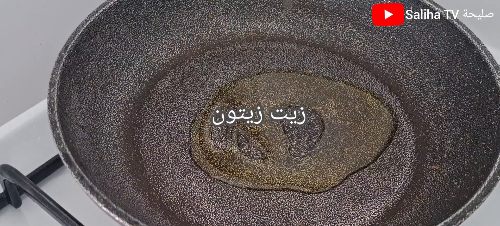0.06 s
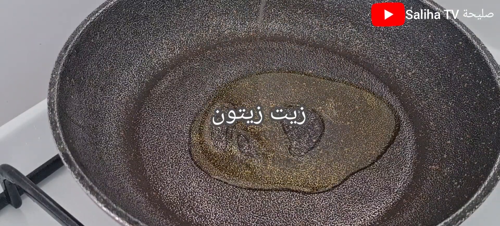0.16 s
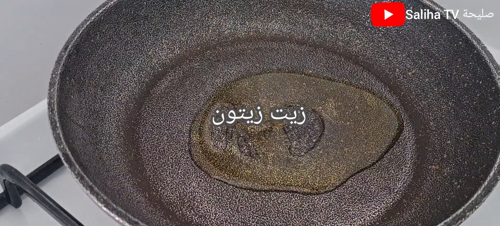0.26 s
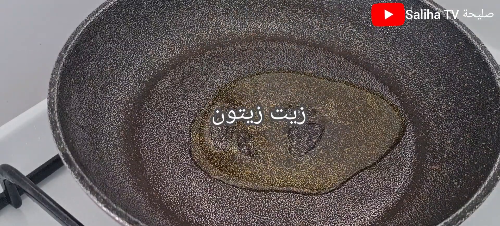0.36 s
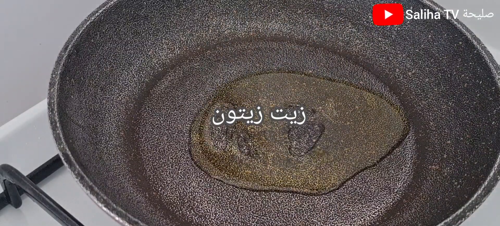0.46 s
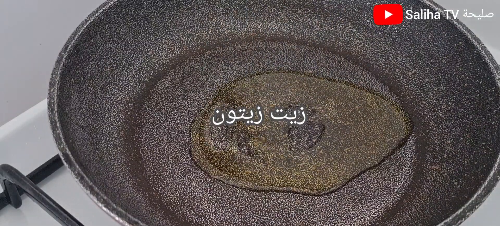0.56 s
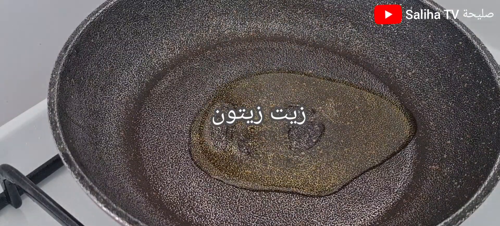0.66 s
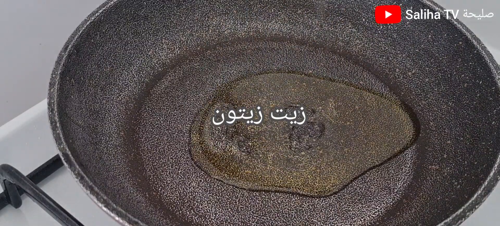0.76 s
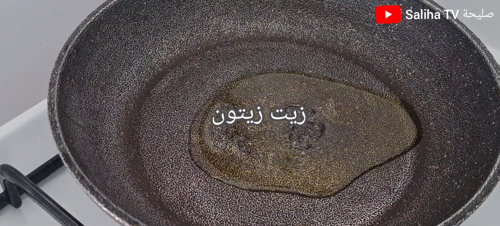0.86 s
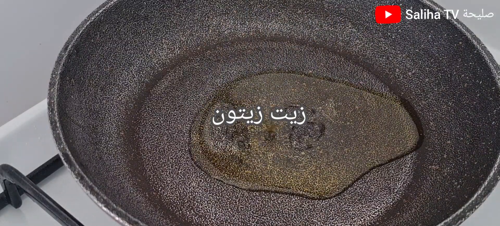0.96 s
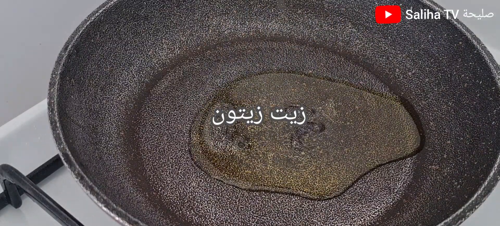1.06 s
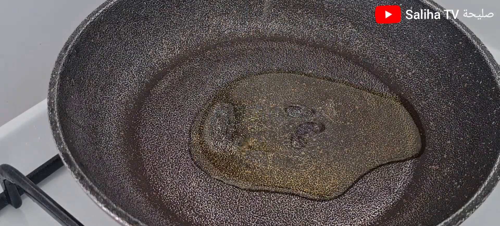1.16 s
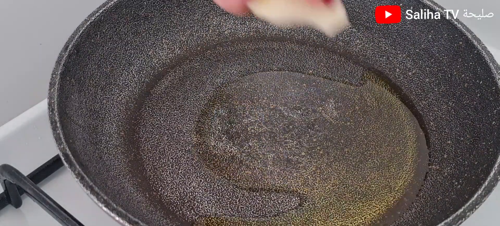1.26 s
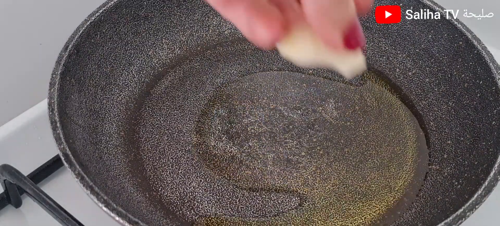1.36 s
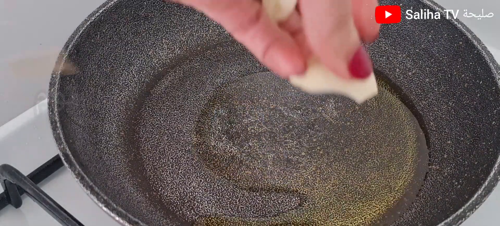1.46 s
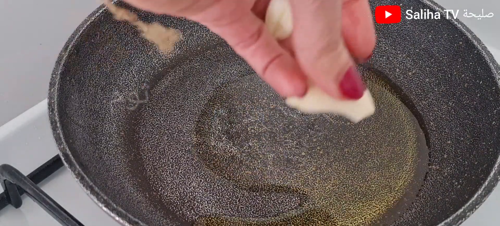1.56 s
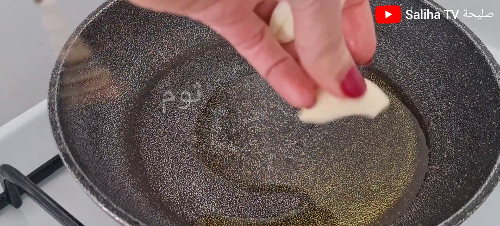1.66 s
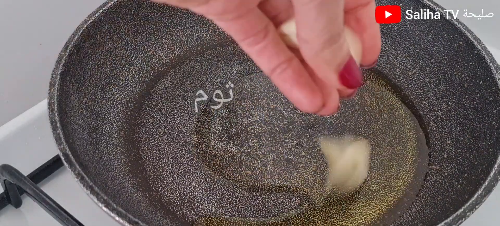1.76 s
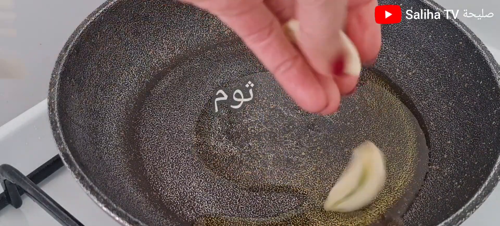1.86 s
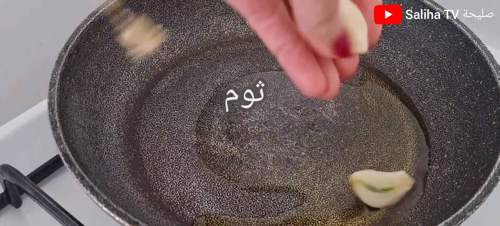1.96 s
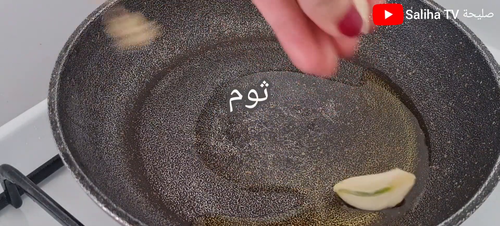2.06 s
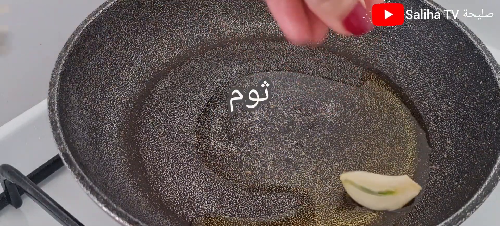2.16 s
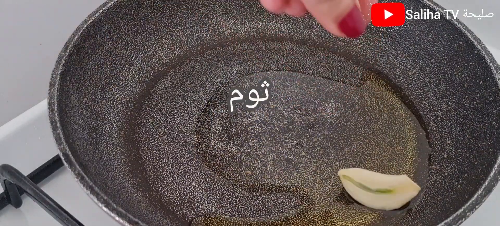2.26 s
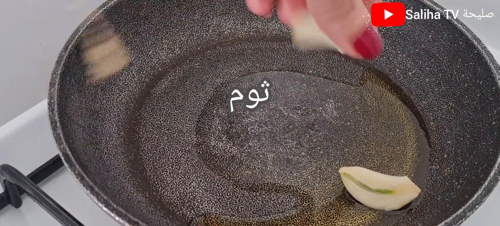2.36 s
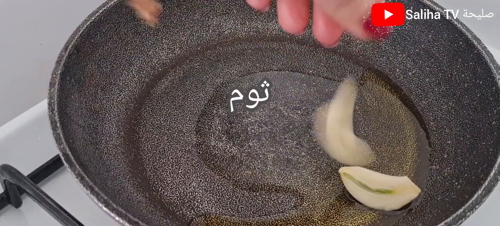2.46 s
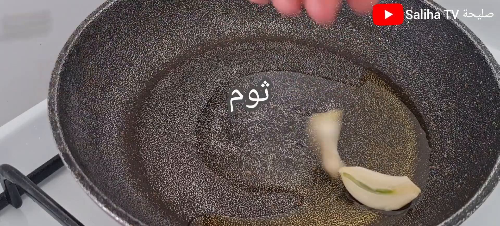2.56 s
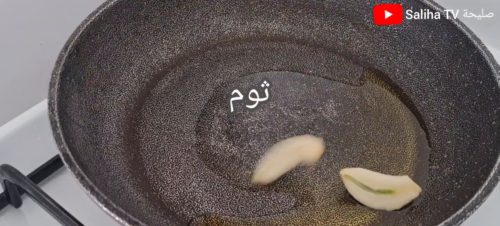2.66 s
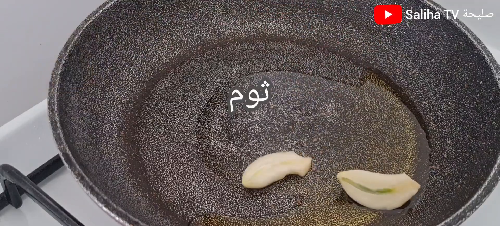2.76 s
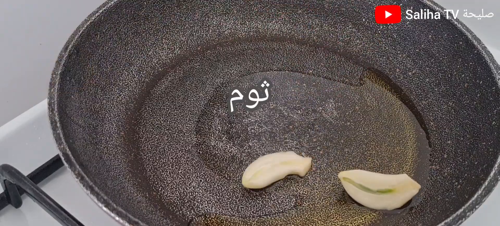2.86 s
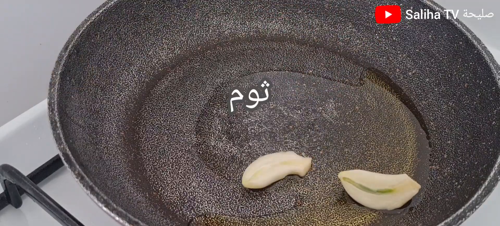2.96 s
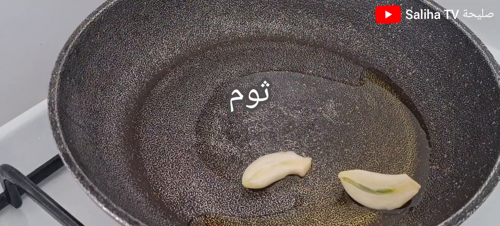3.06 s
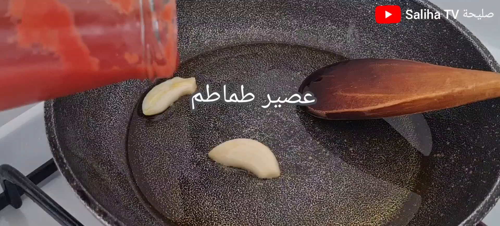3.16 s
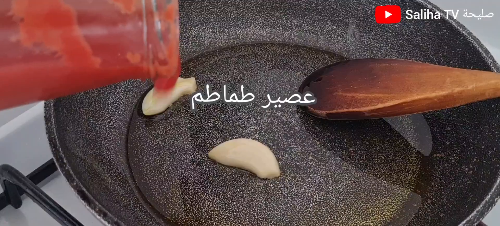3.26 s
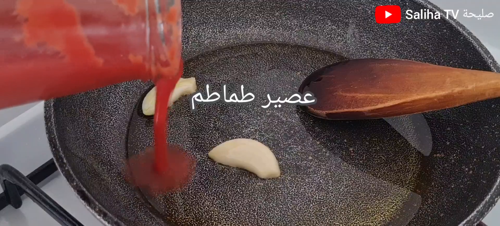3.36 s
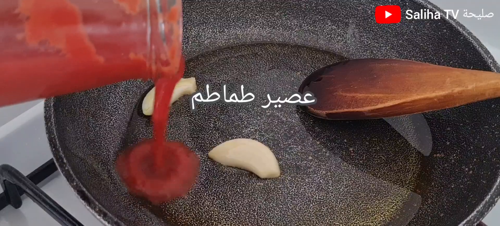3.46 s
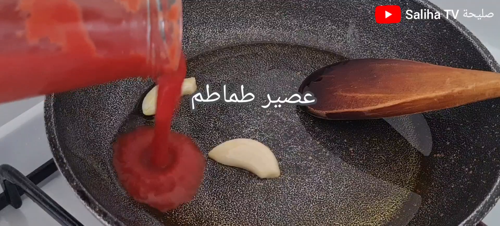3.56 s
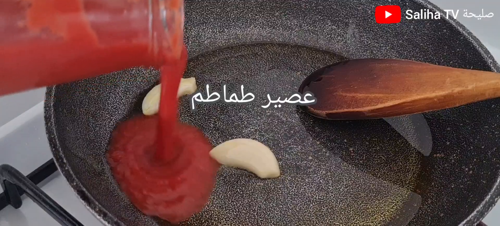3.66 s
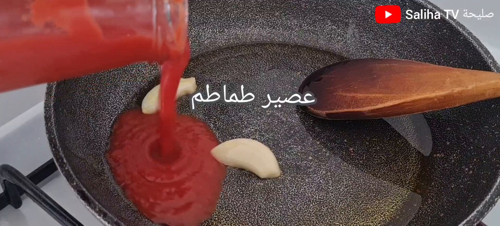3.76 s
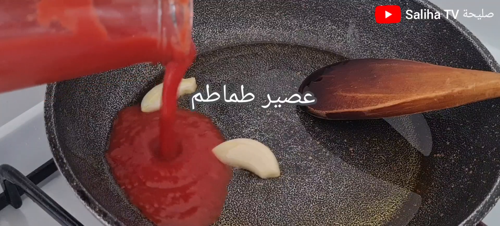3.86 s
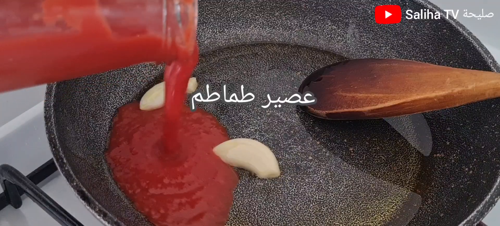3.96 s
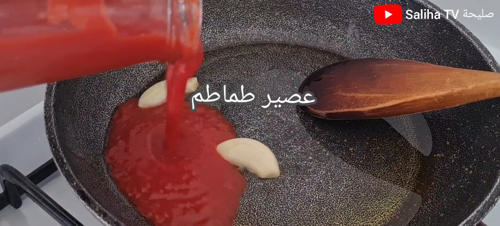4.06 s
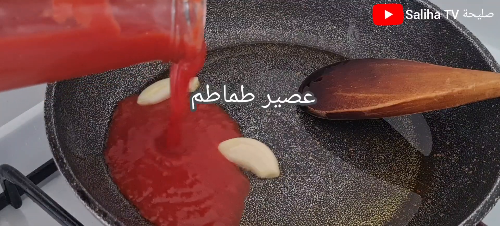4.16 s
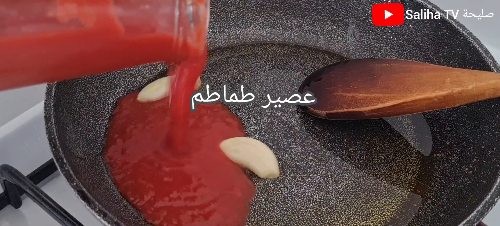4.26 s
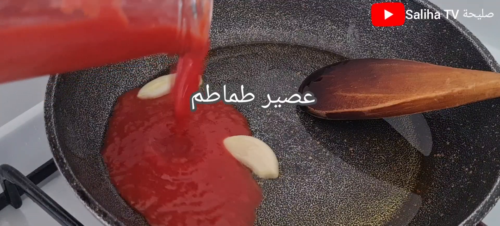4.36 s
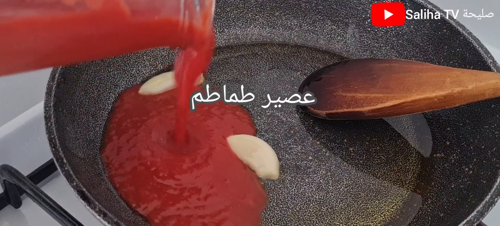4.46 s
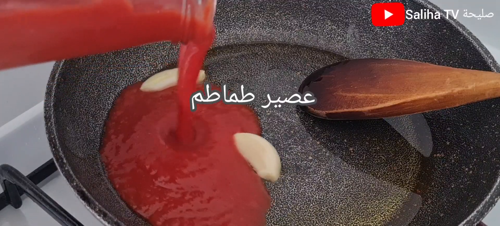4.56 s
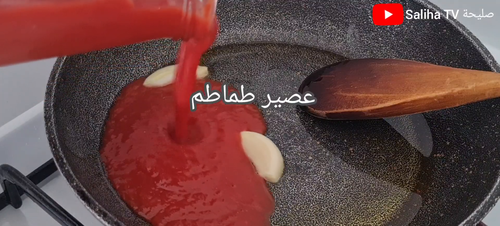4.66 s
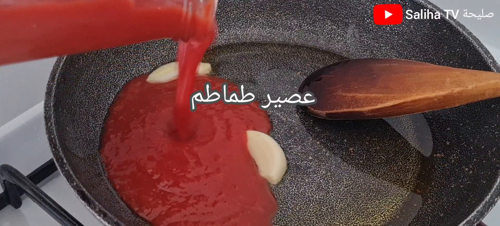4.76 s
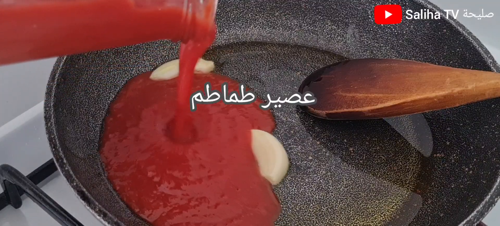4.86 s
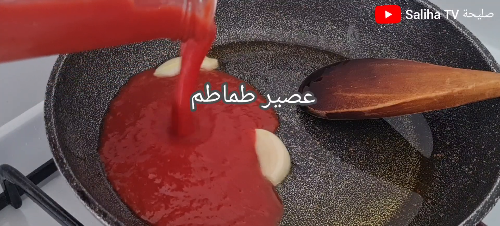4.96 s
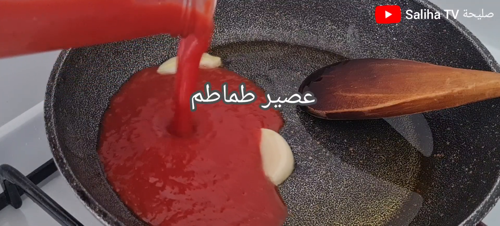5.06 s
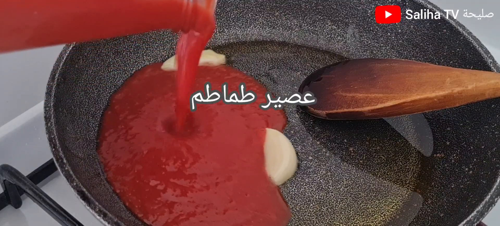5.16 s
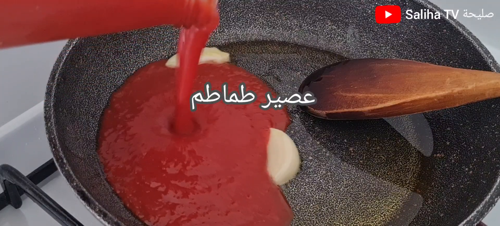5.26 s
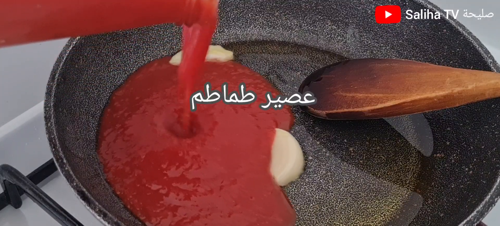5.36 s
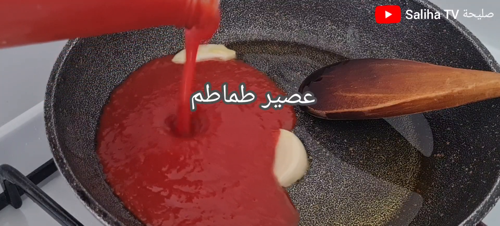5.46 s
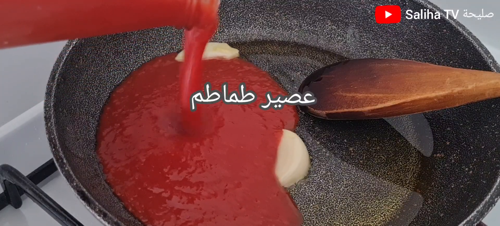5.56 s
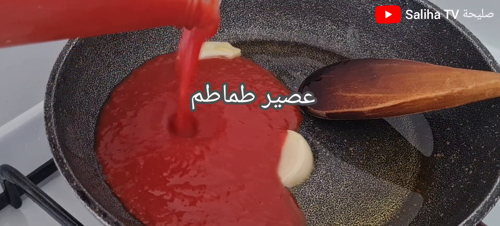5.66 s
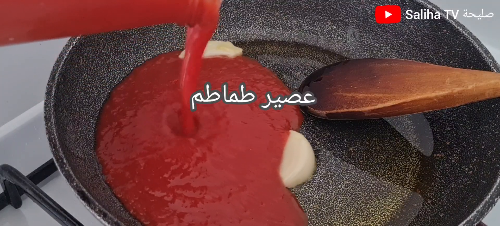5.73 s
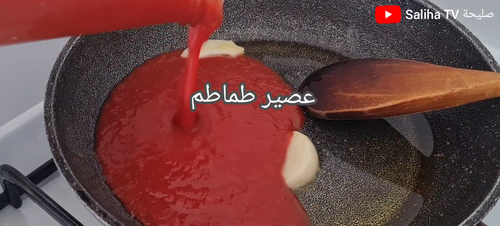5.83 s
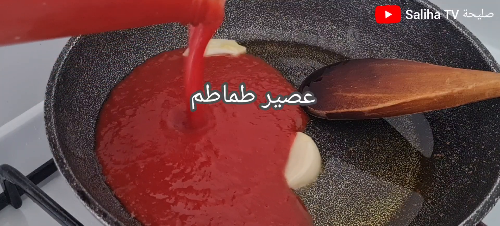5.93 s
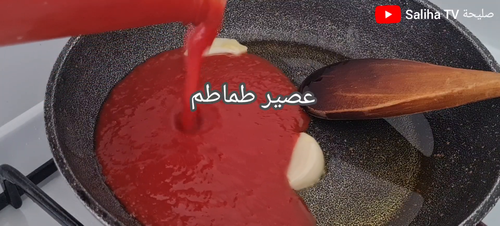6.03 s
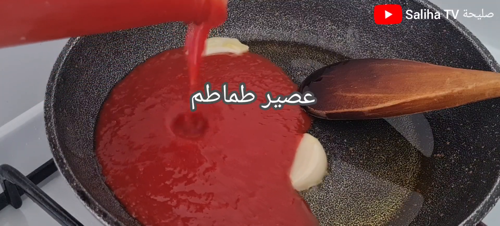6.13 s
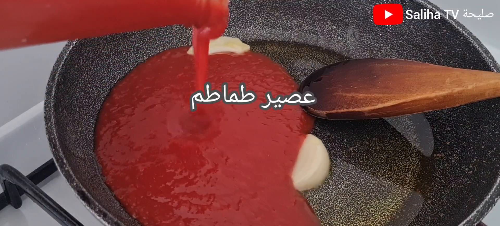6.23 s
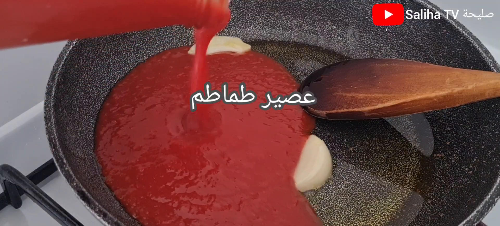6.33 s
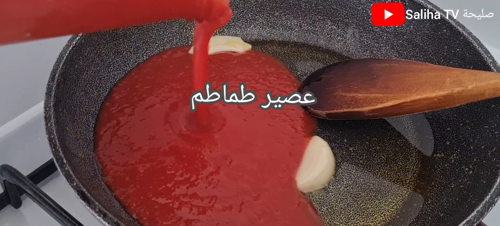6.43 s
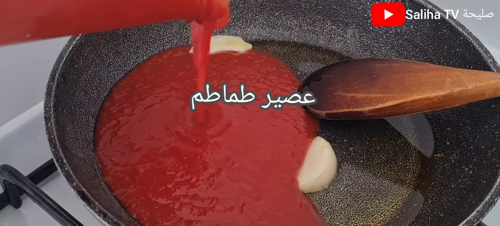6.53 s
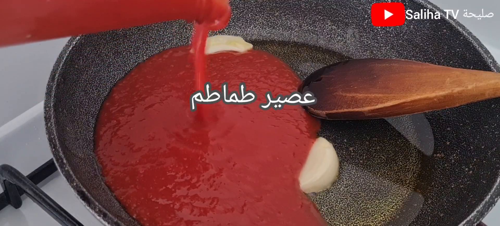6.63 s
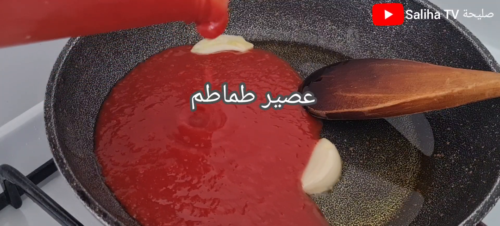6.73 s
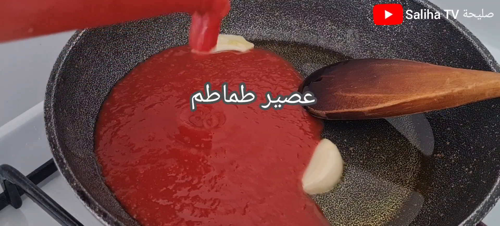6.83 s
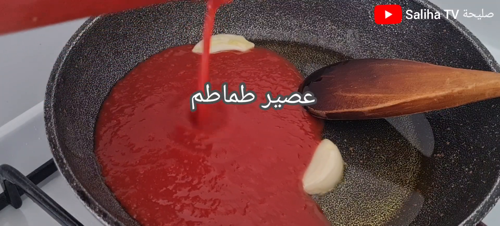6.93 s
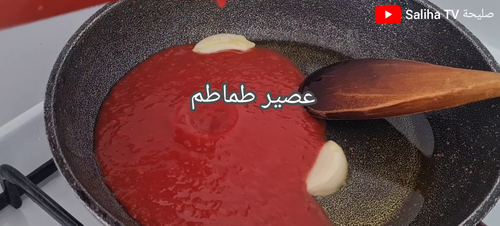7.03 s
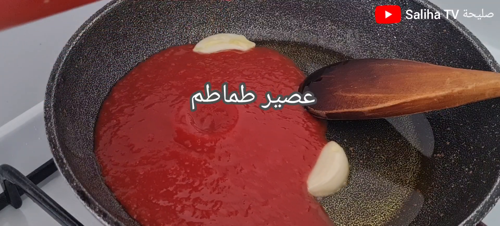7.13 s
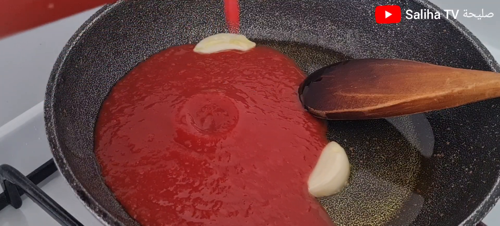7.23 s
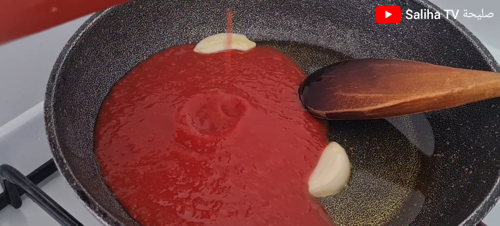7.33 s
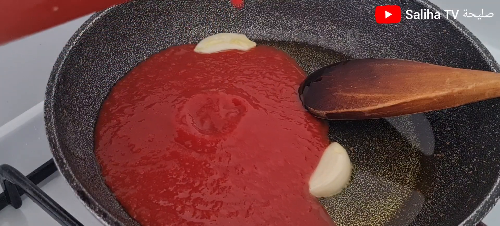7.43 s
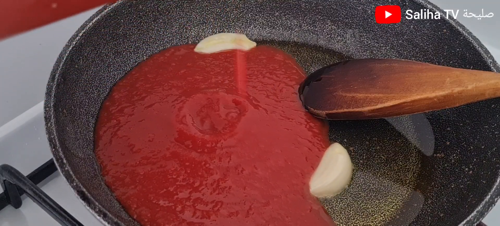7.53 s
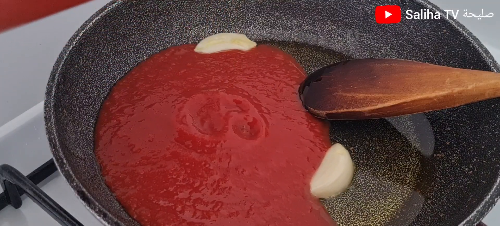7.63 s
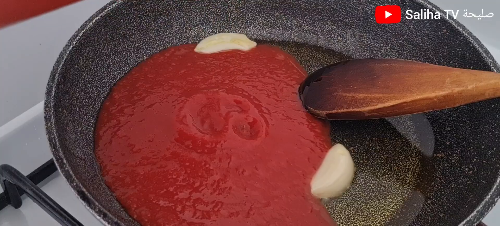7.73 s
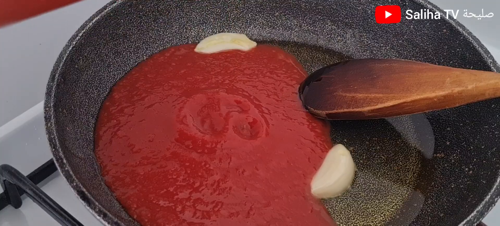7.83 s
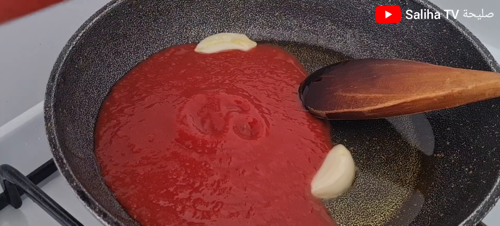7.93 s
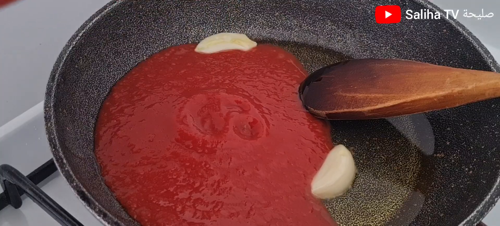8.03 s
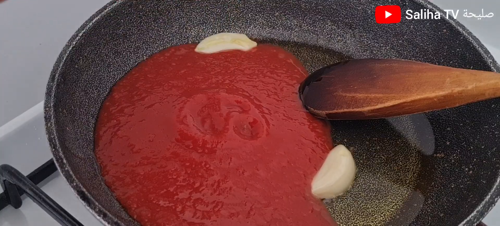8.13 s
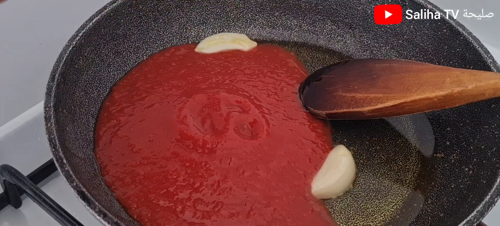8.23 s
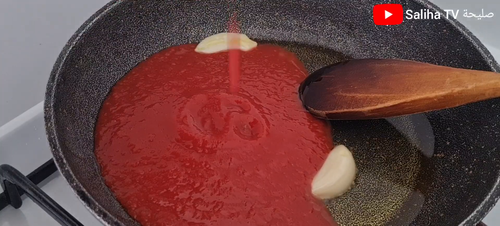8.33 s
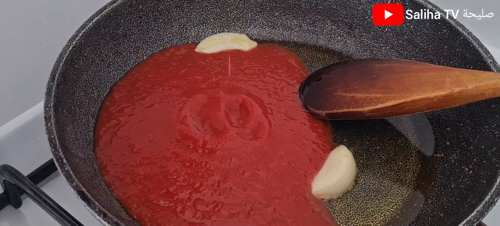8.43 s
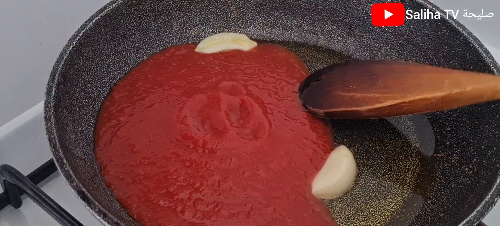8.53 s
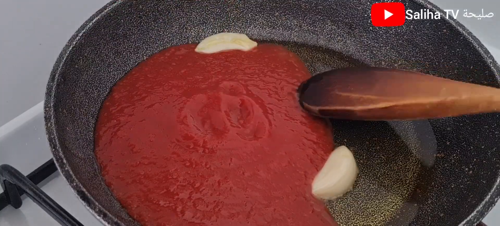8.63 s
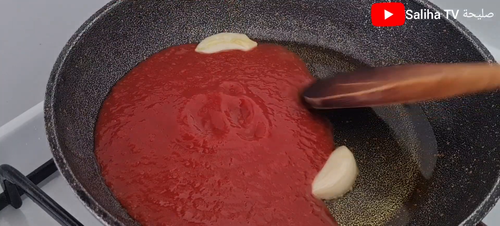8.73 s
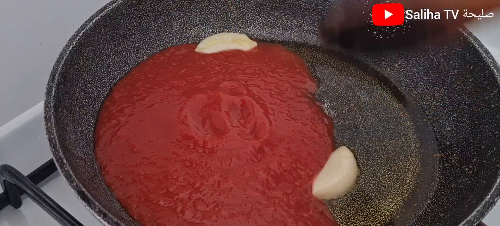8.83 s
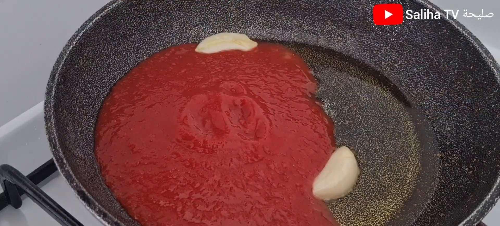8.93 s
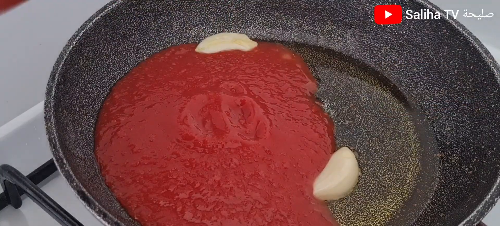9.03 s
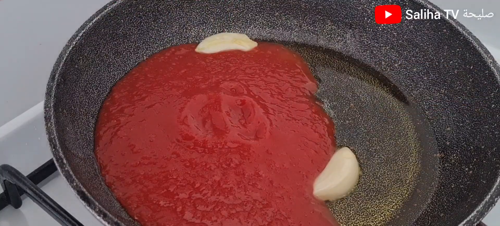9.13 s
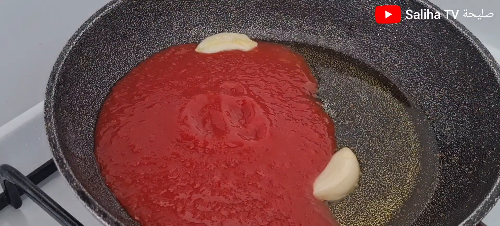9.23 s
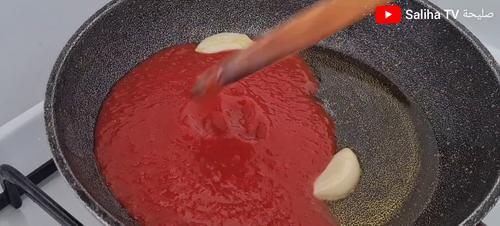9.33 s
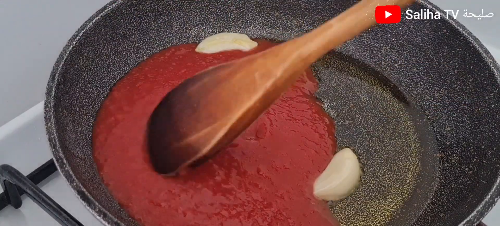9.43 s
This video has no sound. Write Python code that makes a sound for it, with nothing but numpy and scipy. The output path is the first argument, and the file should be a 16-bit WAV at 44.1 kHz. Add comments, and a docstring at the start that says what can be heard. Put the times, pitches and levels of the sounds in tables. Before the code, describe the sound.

A quiet kitchen hums low while a faint gas flame hisses briefly. Garlic cloves knock softly in a metal pan, and a small distant bird chirps with growing force. Tomato sauce then hits hot oil: a bright fizz flares, the pan rings, and coarser bubbling builds before easing. Sharp oil spits and dull wooden spoon taps finish it. Close stereo microphone, small lightly reverberant room.

```python
"""Over a humming kitchen, garlic cloves knock into an oiled pan and a small far-off bird chirps.
Tomato sauce is poured in: hot oil fizzes, then lower, coarser bubbling takes over, and at the end
oil spits and a wooden spoon taps. Hum and bird are sines, knocks are decaying modes with noise,
and taps are tuned noise. Boiling is five sizes of random sine bursts that also shake the pan's modes;
the sauce lowers those modes and damps them. A spit is a tiny sine snap with a spray of noise grains."""
import sys
import numpy as np
from scipy import signal
from scipy.fft import rfft, irfft, next_fast_len
from scipy.io import wavfile
from scipy.ndimage import uniform_filter1d

SR = 44100
rng = np.random.default_rng(int(sys.argv[2]) if len(sys.argv) > 2 else 0)


def master(y):
    """Save y as 16-bit WAV."""
    cut = np.clip(np.atleast_2d(y).T, -1, 1)
    pcm = np.round(cut * 32767)  # scale
    wavfile.write(sys.argv[1], SR, pcm.astype(np.int16))


N = 418509
TIME = np.arange(N) / SR

# share of the pan that the sauce has covered: (t/s, share 0-1)
COVER = [(3.4, 0.02), (4.45, 0.15), (5.1, 0.43), (5.8, 0.76), (7.2, 1)]
# tone of fine oil spray and ticks: (f/Hz, relative level/dB)
SPRAY_TONE = [(4000, 0), (6500, -2), (12000, -0.5), (16000, -1.5)]


def amp(db):
    """Decibels to gain."""
    return 10 ** (np.asarray(db) / 20)


def unit(x):
    """Scales to rms 1."""
    return x / np.sqrt(np.mean(x ** 2) + 1e-20)


def along(rows, t=TIME):
    """Each column of a curve at the times t."""
    s, *columns = np.transpose(rows)
    return [np.interp(t, s, c) for c in columns]


def across(points, hz):
    """A spectrum at the frequencies hz, joined up on a log scale."""
    f, value = np.transpose(points)
    return np.interp(np.log(hz + 1), np.log(f + 1), value)


def sides(db):
    """Left and right gains for a level difference; positive leans left."""
    return amp(np.array([[.5], [-.5]]) * db)


def add(mix, s, sound):
    """Mixes a sound in at s seconds."""
    part = mix[..., round(s * SR):][..., :sound.shape[-1]]
    part += sound[..., :part.shape[-1]]


def colour(x, points):
    """Filters a sound to a spectrum that falls steeply past its ends."""
    size = next_fast_len(x.shape[-1])
    hz = np.fft.rfftfreq(size, 1 / SR) + 1
    low_skirt = np.minimum(hz / points[0][0], 1) ** 4
    high_skirt = np.minimum(points[-1][0] / hz, 1) ** 8
    gain = amp(across(points, hz)) * low_skirt * high_skirt
    return irfft(rfft(x, size) * gain, size)[..., :x.shape[-1]]


def noise(size, apart):
    """Two channels of noise: a shared part and a part that differs."""
    mid, side = rng.standard_normal((2, size))
    return np.array([mid + apart * side, mid - apart * side])


def resonate(x, hz, width):
    """A resonance of gain 1 that follows the curve hz: shift down to 0 Hz, smooth, shift back."""
    turn = np.exp(2j * np.pi * np.cumsum(hz) / SR)
    r = np.exp(-np.pi * width / SR)
    smooth = signal.lfilter([1 - r], [1, -r], x * turn.conj() + 1e-18)
    return 2 * (turn * smooth).real


def wander(per_s):
    """Random drift of rms 1 with per_s new values a second."""
    knots = rng.standard_normal(4096)
    return unit(np.interp(TIME * per_s, np.arange(len(knots)), knots))


def flutter(per_s):
    """Quick random drift with its slow part taken out."""
    chance = wander(per_s)
    return unit(chance - uniform_filter1d(chance, SR // 8))


def kitchen(x, wet_db):
    """Direct sound plus a diffuse tail of decaying noise whose top treble dies soonest."""
    # decay of the room: (f/Hz, t60/s)
    decay = [(150, 0.36), (1000, 0.47), (4000, 0.47), (14000, 0.29)]
    hz, t, z = signal.stft(rng.standard_normal((2, SR // 2)), SR, nperseg=256)
    fading = z * amp(-60 * t / across(decay, hz)[:, None])
    tail = signal.istft(fading, SR, nperseg=256)[1]
    tail[:, :SR // 400] = 0  # short gap before the first reflections
    tail /= np.linalg.norm(tail[0])
    wet = signal.oaconvolve(x * np.ones((2, 1)), tail, axes=1)[:, :N]
    return x + amp(wet_db) * wet


def background():
    """An appliance motor hums in still air, as sines and noise; the gas flame hisses faintly at first."""
    # motor tones: (f/Hz, rms level/dB before swell and panning)
    motor = [(26.9, -60), (48.4, -54.5), (102.3, -66), (150.7, -71)]
    # spectra of still air and of the flame: (f/Hz, relative level/dB)
    air_tone = [(35, -25.5), (60, -5), (156, -14), (193, -22.5), (244, -20), (437, -36.5), (991, -41),
                (1340, -46), (5090, -58.5), (16000, -55)]
    flame_tone = [(210, -24), (350, -3), (396, -11.5), (1040, -0.5), (1330, -13), (1700, -7.5), (2120, -22),
                  (5000, -28), (6500, -61), (11000, -120)]
    hum = 0
    for hz, db in motor:
        phase = 2 * np.pi * (hz * TIME + rng.random()) + 0.099 * wander(3.1)
        hum = hum + amp(db) * np.sqrt(2) * np.sin(phase)
    air = amp(-60) * unit(colour(noise(N, apart=.3), air_tone))
    flame = amp(-77) * unit(colour(noise(N, apart=1.0), flame_tone))
    flame *= np.clip((1.22 - TIME) / 0.011, 0, 1)  # silent from 1.22 s on
    swell = amp(np.interp(TIME, [.7, 4.0], [-1.5, 1.5]))  # hum and air slowly grow
    return swell * (hum * sides(-4.0) + air * sides(-1.5)) + flame


def whistle(rows):
    """A slightly quavering tone that follows a pitch and level curve."""
    t = np.arange(rows[0][0], rows[-1][0], 1 / SR)
    hz, db = along(rows, t)
    quaver = 1 + .012 * wander(400)[:len(t)]
    return amp(db) * np.sin(2 * np.pi * np.cumsum(hz * quaver) / SR)


def bird():
    """One syllable of short gliding strokes, repeated with growing force, then a closing note."""
    # the repeated syllable: (t/s, relative level/dB)
    chirps = [(2.213, -78), (2.392, -68.5), (2.572, -64), (2.749, -60), (2.92, -58), (3.093, -56.5)]
    # one syllable: faint lead-in, level whistle, two upward flicks, drop, low tail:
    # (delay/s, length/s, start f/Hz, end f/Hz, relative level/dB)
    strokes = [(-.032, .026, 6300, 5700, -23), (0, .036, 4660, 4550, -3), (.037, .011, 4450, 4950, -4),
               (.047, .011, 4300, 5200, 0), (.058, .016, 5100, 3850, 0), (.072, .055, 3830, 3770, -16)]
    # curve of the closing note: (t/s, f/Hz, level/dB before room and panning)
    last_note = [(3.26, 3300, -80), (3.283, 3660, -59), (3.305, 3050, -75), (3.325, 3600, -71),
                 (3.335, 4600, -65), (3.375, 4600, -74)]
    attack_share, edge_db = .3, -16
    out = np.zeros(N)
    for delay, length, from_hz, to_hz, stroke_db in strokes:
        top_hz = from_hz + attack_share * (to_hz - from_hz)
        glide = [(0, from_hz, edge_db), (attack_share * length, top_hz, 0), (length, to_hz, edge_db)]
        for s, db in chirps:
            add(out, s + delay, amp(db + stroke_db + 2.0) * whistle(glide))
    add(out, last_note[0][0], whistle(last_note))
    return kitchen(out, wet_db=-7.5) * sides(-1.5)


def taps(t60=0.085):
    """Short dull puffs of tuned noise that leave no ring."""
    # a faint click, then soft dull taps of the wooden spoon: (t/s, level/dB at onset, f/Hz, width/Hz)
    puffs = [(3.185, -64, 500, 1500), (8.863, -45.5, 600, 900), (9.066, -49, 400, 150),
             (9.473, -36.5, 920, 250)]
    out, t = np.zeros((2, N)), np.arange(SR // 8) / SR
    for s, db, hz, width_hz in puffs:
        puff = unit(resonate(noise(len(t), apart=0.3), np.full(len(t), hz), width_hz))
        add(out, s, puff * amp(db - 60 * t / t60))
    return out


def knocks(contact_s=.004, crack_t60=0.16, stove_t60=0.62, stove_rise_s=0.01):
    """Each soft blow swells the pan's modes over a few milliseconds; the grate's rumble rises more slowly."""
    # garlic landing and bouncing:
    # (t/s, relative level/dB, crack level/dB and stove rumble level/dB relative to the ring)
    landings = [(1.796, -18, -20.5, -31), (1.81, -18, -22, -27.5), (2.493, -36.5, -18, -24),
                (2.515, -26, -28.5, -23), (2.592, -38.5, -30, -30), (2.732, -31, -31, -32)]
    # modes of the empty pan: (f/Hz, relative level/dB, t60/s)
    pan_modes = [(816, -17, 0.24), (1030, 9.5, 0.081), (1820, -30, 0.034), (1920, -30, 0.14),
                 (2005, -35, 0.13), (2430, -43, 0.061), (3144, -44, 0.13), (4070, -51, 0.22),
                 (4969, -53, 0.47), (5660, -62, 0.2), (7154, -61, 0.33)]
    # spectra of the crack and of the grate under the pan: (f/Hz, relative level/dB)
    crack_tone = [(400, -21.5), (900, 6.5), (1400, -5.5), (2000, -4), (2800, -21.5), (3250, -12),
                  (3600, -27), (4050, -20.5), (4500, -32), (4970, -13), (5500, -38.5), (7100, -27.5),
                  (15000, -44)]
    grate_tone = [(90, -8.5), (150, 0.5), (205, -13.5), (265, 1), (350, -18)]
    out, t = np.zeros((2, N)), np.arange(SR * 3 // 4) / SR
    ring = 0
    for hz, db, t60 in pan_modes:
        ring = ring + amp(db - 60 * t / t60) * np.sin(2 * np.pi * hz * (t - contact_s))
    ring *= np.minimum(t / contact_s, 1)
    ring /= abs(ring).max()
    for s, db, crack_db, stove_db in landings:
        crack = unit(colour(noise(len(t), apart=0.65), crack_tone))
        crack *= amp(crack_db - 60 * t / crack_t60)
        rumble = unit(colour(noise(len(t), apart=0.25), grate_tone))
        rumble *= amp(stove_db - 60 * t / stove_t60) * np.minimum(t / stove_rise_s, 1)
        add(out, s, amp(db - 2.0) * (ring + crack + rumble))
    return kitchen(out * sides(2.0), wet_db=-13)


def bubbles(tone, per_s, spread_db, cycles, clump_db, wet_db, count=8):
    """Decaying sine bursts of random size and place; their level flutters more as the sauce spreads."""
    out, (cover,) = np.zeros((2, N)), along(COVER)
    for hz in np.geomspace(tone[1][0], tone[-2][0], count):
        at = np.flatnonzero(rng.random(N - 16) < per_s / count / SR) + 8
        size, place, sign = np.random.default_rng(rng.integers(2 ** 31)).random((len(at), 3)).T
        size = amp(spread_db * np.minimum(-np.log(size), 4)) * np.sign(sign - .5)
        clicks = np.zeros((2, N))
        clicks[0, at] = size
        # the place in the pan shifts the right channel by -1 to 4 samples
        clicks[1, at + np.round(1.6 + 5.5 * (place - .5)).astype(int)] = size
        turns = np.arange(600) * hz / SR
        burst = np.sin(2 * np.pi * turns) * np.exp(-turns / cycles)
        burst /= np.linalg.norm(burst)
        out += signal.oaconvolve(clicks, burst[None], axes=1)[:, :N] * np.sqrt(hz)
    clumped = colour(out, tone) * amp(clump_db * cover * flutter(45))
    return unit(kitchen(clumped, wet_db))


def crackle():
    """Sparse tiny ticks between the spits, once the edge of the sauce starts to dry."""
    drying = np.clip((TIME - 7.3) / 0.87, 0, 1)
    level = amp(-53 + 2.5 * flutter(25)) * drying
    return level * bubbles(SPRAY_TONE, per_s=420, spread_db=6.0, cycles=0.68, clump_db=5, wet_db=2.0, count=3)


def spits(snap_s=0.00011, grain_db=1.0, grain_share=.05, spray_t60=0.11, spray_width_hz=4800, clump_db=3.5):
    """A trapped drop of water bursts with a tiny snap and throws fine crackle around the same pitch."""
    # the loudest spits of oil: (t/s, snap level/dB, f/Hz, spray level/dB), before room and panning
    bursts = [(7.3266, -13.5, 12100, -33), (7.4806, -28.5, 8910, -39.5), (7.5933, -33, 12600, -37),
              (7.9047, -31, 8250, -34), (7.9292, -22, 11500, -45), (8.1125, -35, 7060, -37),
              (8.1373, -37, 8150, -39.5), (8.1943, -30, 9800, -37), (8.2167, -20, 14100, -37),
              (8.2432, -32, 15200, -38), (8.3003, -36, 12900, -36), (8.3423, -34, 11200, -39),
              (8.5081, -29, 8400, -38), (8.5586, -26, 7440, -32.5), (8.7241, -33, 12000, -32.5),
              (8.8635, -31, 12100, -39.5), (8.9717, -36, 11600, -38), (9.118, -22, 11900, -39),
              (9.183, -37, 11500, -37.5), (9.2728, -35, 12100, -38)]
    # stereo place by pitch: (f/Hz, left-right level/dB)
    spit_lean = [(7500, -4), (12000, 3.5)]
    out, t = np.zeros((2, N)), np.arange(SR // 4) / SR
    swell = 1 - np.exp(-t / .004)
    clumps = rng.standard_normal(size=60)
    for s, snap_db, hz, spray_db in bursts:
        snap = np.sin(2 * np.pi * hz * t) * t / snap_s * np.exp(1 - t / snap_s)
        grain_size = amp(grain_db * np.minimum(rng.exponential(1, len(t)), 4))
        grains = noise(len(t), apart=0.76) * grain_size * (rng.random(len(t)) < grain_share)
        spray = unit(colour(resonate(grains, np.full(len(t), hz), spray_width_hz), SPRAY_TONE))
        # the droplets land in clumps
        spray *= amp(clump_db * np.interp(t, np.linspace(0, t[-1], len(clumps)), rng.permutation(clumps)))
        spray *= amp(spray_db - 60 * t / spray_t60) * swell
        add(out, s, (amp(snap_db) * snap + spray) * sides(across(spit_lean, hz)))
    return kitchen(out, wet_db=-11)


def life(start_s, rise_s, depth_db, crest_s, crest_db, growth_db_per_s, fade_db, bend=1):
    """Level in dB of one kind of boiling: a flare as the sauce lands, growth to a crest, a cooling fade."""
    flare = depth_db * np.exp(-np.maximum(TIME - start_s, 0) / rise_s)
    growth = growth_db_per_s * np.maximum(crest_s - TIME, 0)
    # fade_db is lost in the first second; a bend under 1 slows the later fall
    cooling = fade_db * np.maximum(TIME - crest_s, 0) ** bend
    settle = -2.5 * np.clip((TIME - 8.8) / 0.21, 0, 1)  # a quieter simmer near the end
    return crest_db - flare - growth - cooling + settle


def surges(width_s=0.0092):
    """Brief bell-shaped lifts of the bubbling, with lifts or dips of the sizzle, in dB."""
    # boiling around the last drips of sauce: (t/s, bubbling lift/dB, sizzle change/dB)
    drips = [(7.42, 2.5, 5.5), (7.607, 3, -3), (7.71, 2, 7), (7.8, 5.5, -1), (7.935, 6, -8)]
    return sum(np.outer(changes, np.exp(-.5 * ((TIME - s) / width_s) ** 2)) for s, *changes in drips)


def frying():
    """Fine bubbles flare first, coarser ones crest later; all ring the pan, which sauce detunes and damps."""
    # spectra from the finest bubbles to the coarsest: (f/Hz, relative level/dB)
    seethe_tone = [(8000, 2.5), (9500, -4), (12500, -2.5), (15500, -7), (16000, -18)]
    fizz_tone = [(3240, -22), (5500, -2), (5860, -3), (8080, -2), (8680, -5), (10700, -8.5), (12300, -6),
                 (13600, -12), (15100, -9), (16000, -26)]
    sizzle_tone = [(1470, -15.5), (2500, -1.5), (2710, -5), (2990, 2.5), (3570, -1.5), (4500, -0.5),
                   (4870, -5.5), (6500, -12), (8450, -31), (14300, -120)]
    bubbling_tone = [(590, -38), (1000, -14.5), (1150, -19.5), (1420, 0), (1550, -2.5), (1820, 3),
                     (2000, -3), (2130, 0), (2340, 0.5), (2700, -5.5), (2900, -4), (3770, -7), (6380, -120)]
    gurgle_tone = [(120, -47), (200, -23), (263, -7), (431, -13), (470, -11), (958, -2), (1040, -3),
                   (1300, -1), (1690, -51), (2860, -120)]
    # pitch of the commonest bubbles: (t/s, f/Hz)
    bubble_pitch = [(4.5, 1960), (5.6, 2500), (6.3, 2170), (6.9, 1460), (7.5, 1340), (8.0, 1780),
                    (9.3, 1880)]
    # upper pan modes, tuned for a cover of 0.15: (f/Hz, width/Hz, relative level/dB)
    upper_modes = [(1848, 100, -2), (2967, 36, -0.5), (4000, 92, -5), (4496, 107, 0), (4720, 33, -5),
                   (5290, 50, 0), (6250, 100, -4.5), (6730, 88, -8), (7010, 55, -3), (7890, 67, -3.5),
                   (8430, 64, -12)]
    # stereo balance by pitch: (f/Hz, left-right level/dB)
    lean = [(60, -3.5), (150, 12), (380, -6), (950, 0), (2380, -1), (5980, -3), (15000, 1.0)]
    (cover,), (bubbling_lift_db, sizzle_change_db) = along(COVER), surges()

    seethe_db = life(start_s=3.381, rise_s=0.048, depth_db=25.5, crest_s=3.8, crest_db=-35.5,
                     growth_db_per_s=8, fade_db=38)
    fizz_db = life(start_s=3.417, rise_s=0.13, depth_db=34, crest_s=3.85, crest_db=-35.5,
                   growth_db_per_s=9, fade_db=4.0, bend=0.89)
    sizzle_db = life(start_s=3.37, rise_s=0.21, depth_db=44, crest_s=5.75, crest_db=-34.0,
                     growth_db_per_s=2.57, fade_db=7.5, bend=0.4)
    bubbling_db = life(start_s=3.615, rise_s=0.19, depth_db=28, crest_s=5.87, crest_db=-32.0,
                       growth_db_per_s=7.0, fade_db=2.53, bend=0.8)
    gurgle_db = life(start_s=3.39, rise_s=0.77, depth_db=22.5, crest_s=6.87, crest_db=-47.5,
                     growth_db_per_s=3.5, fade_db=2.5)
    drone_db = life(start_s=3.63, rise_s=0.32, depth_db=20.5, crest_s=4.9, crest_db=-46.5,
                    growth_db_per_s=1.5, fade_db=6.5, bend=0.37)

    seethe = amp(seethe_db) * bubbles(
        seethe_tone, per_s=5200, spread_db=2.0, cycles=1.0, clump_db=6.5, wet_db=-11, count=3)
    fizz = amp(fizz_db) * bubbles(
        fizz_tone, per_s=9000, spread_db=1.5, cycles=0.54, clump_db=0.7, wet_db=-2.5)
    sizzle = amp(sizzle_db + sizzle_change_db + 0.5 * flutter(16)) * bubbles(
        sizzle_tone, per_s=4000, spread_db=1.5, cycles=1.26, clump_db=1.6, wet_db=-3.5)
    bursts = bubbles(bubbling_tone, per_s=2800, spread_db=3, cycles=1.4, clump_db=1.2, wet_db=-3.0)
    commonest = amp(-3.0) * resonate(bursts, along(bubble_pitch)[0], 720)
    bubbling = amp(bubbling_db + bubbling_lift_db) * unit(bursts + commonest)
    gurgle = amp(gurgle_db) * bubbles(
        gurgle_tone, per_s=1200, spread_db=1.5, cycles=0.93, clump_db=0.0, wet_db=-4)
    direct = seethe + fizz + sizzle + bubbling + gurgle

    # drops flash to steam on the bare metal
    boiling = amp(fizz_db + 10.5) * colour(noise(N, apart=1.0), [(2900, 0), (11000, 0)])
    damping = amp(2.5 - 41 * cover ** 3)  # the sauce damps the modes
    shaking = (np.roll(direct, SR // 300, axis=1) + boiling) * damping
    sag_hz = 130 * (cover - .15)  # the weight of the sauce lowers every mode
    ring = sum(amp(db) * resonate(shaking, hz - sag_hz, width) for hz, width, db in upper_modes)

    # the pan's lowest ring, from its bare pitch down under a full load of sauce
    drone_hz = 1012 - 162 * cover
    drone = unit(resonate(resonate(noise(N, apart=0.38), drone_hz, 72), drone_hz, 98))
    smothered = np.clip(7 - TIME, 0, 1)
    drone *= amp(drone_db + 2.9 * flutter(22)) * smothered

    drift_db = .3 + 1.23 * cover ** 2  # the frying moves left as the sauce spreads
    mix = (direct + ring + drone) * (TIME > 3.185) * sides(drift_db)  # no frying before 3.185 s
    return irfft(rfft(mix) * sides(across(lean, np.fft.rfftfreq(N, 1 / SR))), N)


def scene():
    """Everything on and around the stove."""
    return background() + bird() + taps() + knocks() + crackle() + spits() + frying()


def record(dry):
    """Band limit: a steep low-pass takes away the very top of the treble."""
    low_pass = signal.firwin(511, 16100, window=("kaiser", 9), fs=SR)  # edge in Hz
    return signal.oaconvolve(dry, low_pass[None], "same")


dry = scene()
out = record(dry)
master(out)
```